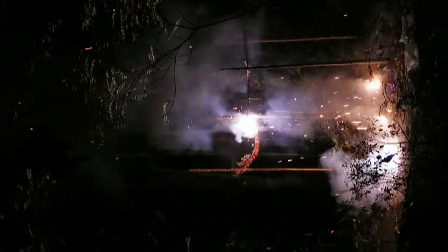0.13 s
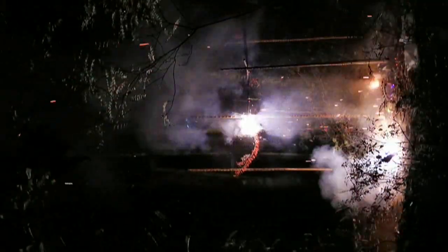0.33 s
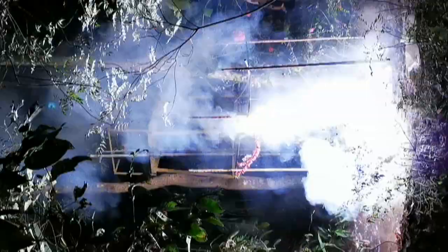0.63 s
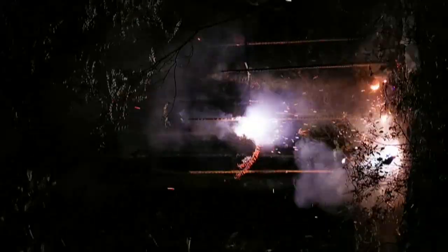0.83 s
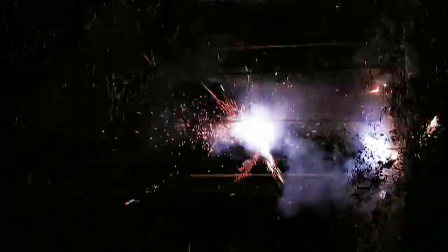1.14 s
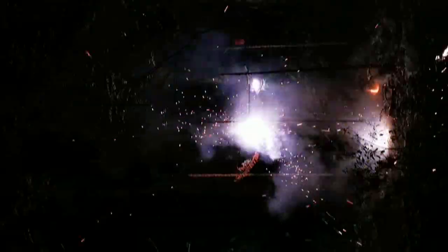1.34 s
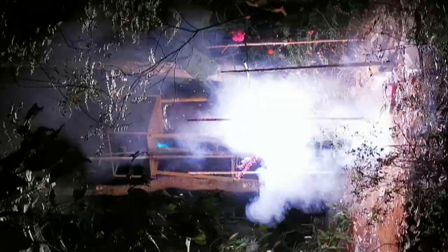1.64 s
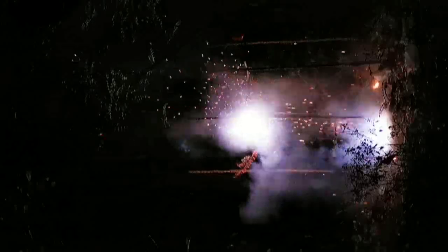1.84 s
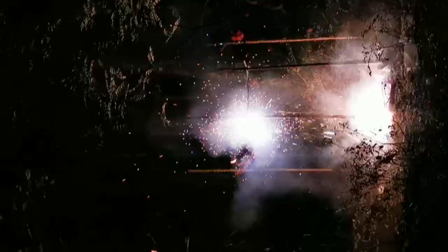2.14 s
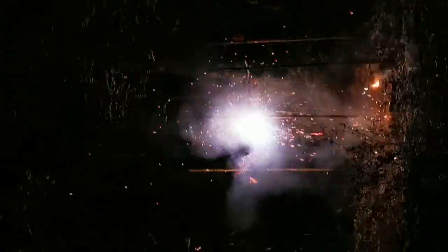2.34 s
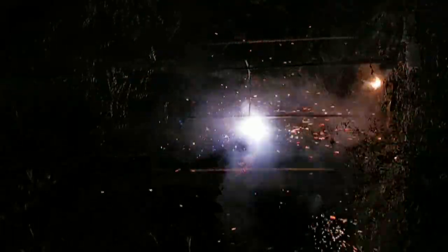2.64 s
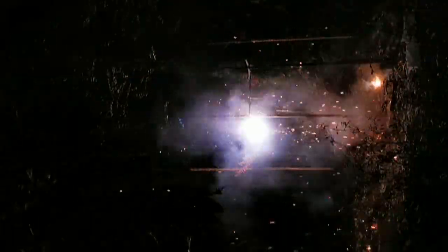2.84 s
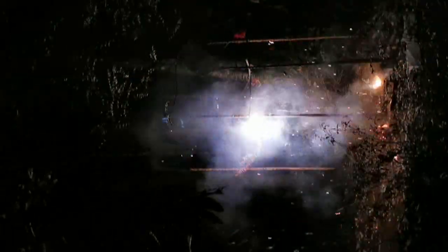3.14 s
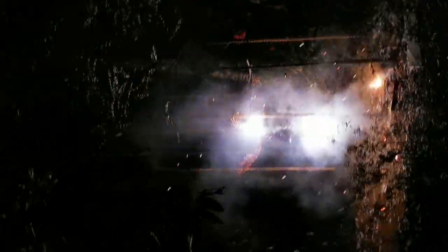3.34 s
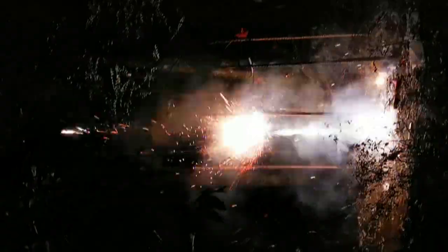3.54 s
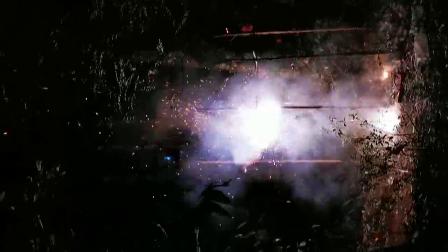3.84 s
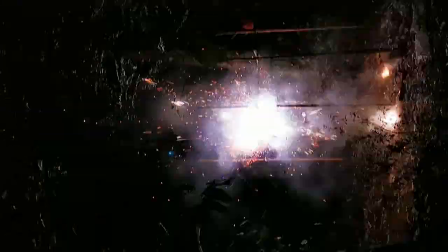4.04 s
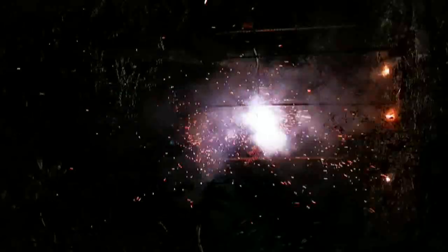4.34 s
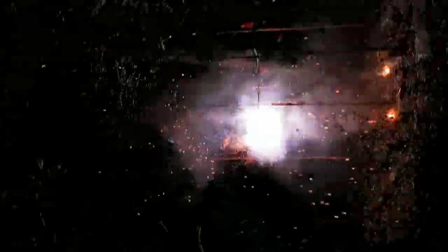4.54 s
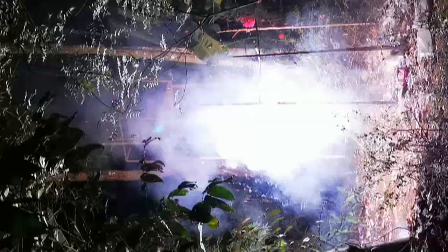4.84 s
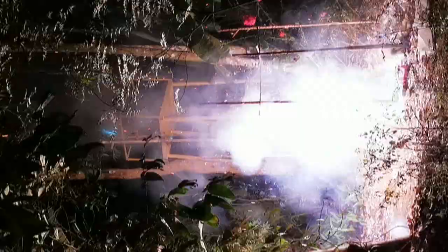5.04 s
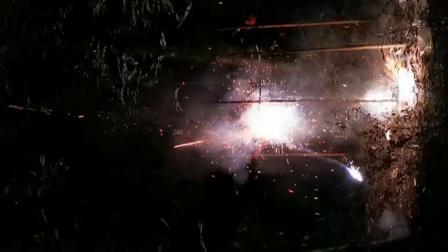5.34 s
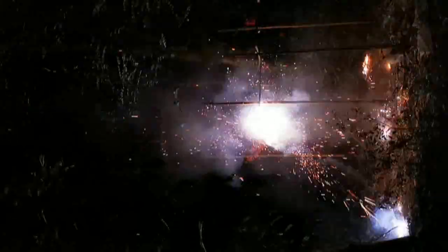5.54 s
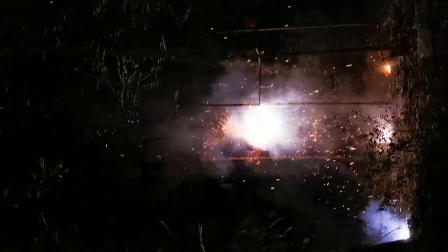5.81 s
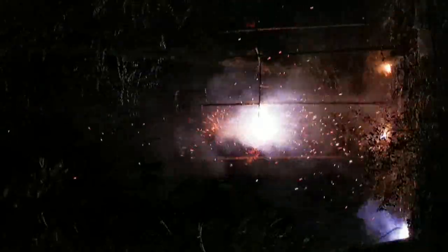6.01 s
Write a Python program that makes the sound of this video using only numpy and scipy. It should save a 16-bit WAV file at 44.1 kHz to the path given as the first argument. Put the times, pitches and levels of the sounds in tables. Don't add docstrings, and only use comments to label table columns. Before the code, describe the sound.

Outdoors among trees at night, firecrackers explode at irregular intervals: sparse at first, then crowded into uneven clusters of sharp cracks, weaker pops and dull double bangs. Low thumps and soft wind rumble sit beneath. Echoes slap back almost at once and roll away for a second or more. Stereo phone sound, mid-heavy, briefly ducking around every bang.

```python
import sys
import numpy as np
from scipy import signal
from scipy.fft import rfft, irfft, next_fast_len
from scipy.io import wavfile
from scipy.ndimage import uniform_filter1d, minimum_filter1d

SR = 44100
rng = np.random.default_rng(int(sys.argv[2]) if len(sys.argv) > 2 else 0)


def digitize_waveform(pressure):
    field = np.atleast_2d(pressure).T
    bounded = np.clip(field, -1, 1)
    quanta = np.round(bounded * 32767).astype(np.int16)
    wavfile.write(sys.argv[1], SR, quanta)


def boost(x):
    u = np.asarray(x, float) / 20
    return 10 ** u


N = 272097
STEP, SIZE = 16, next_fast_len(N)
SLAP_S = 0.0182


def at_hz(points, hz):
    points = np.array(points)
    return np.interp(np.log(hz + 1), np.log(points[:, 0]), points[:, 1])


def full_rate(steps):
    return np.interp(np.arange(N) / STEP, np.arange(len(steps)), steps)


def drift(rate_hz):
    r = np.exp(-2 * np.pi * rate_hz * STEP / SR)
    slow = signal.lfilter([1], [1, -2 * r, r * r], rng.standard_normal(N // STEP + 502))[500:]
    return slow / slow.std()


def dying(power, t60_s, rise_s):
    fall = boost(-120 * STEP / (t60_s * SR))
    rise = np.exp(-STEP / (rise_s * SR))
    tail = signal.lfilter([1], [1, -fall], power)
    return signal.lfilter([1 - rise], [1, -rise], tail)


# (frequency [Hz], correlation [-1..1])
LIKENESS = [(60, 0.62), (140, 0.86), (330, .88), (800, 0.94), (1400, 0.78), (2300, 0.27), (3500, 0.36),
            (7000, 0.053), (15000, 0.13)]
# (frequency [Hz], phase [rad])
LEFT_LEAD = [(0, -2), (1900, 0.03), (2350, -0.94), (3500, 5), (10000, 15), (22050, 30)]


def stereo_noise():
    mid, side = rfft(rng.standard_normal((2, SIZE)), axis=1)
    hz = np.arange(len(mid)) * SR / SIZE
    alike = np.clip(at_hz(LIKENESS, hz), -1, 1)
    common, apart = np.sqrt(1 + alike) * mid, np.sqrt(1 - alike) * side
    left, right = (common + apart) / np.sqrt(2), (common - apart) / np.sqrt(2)
    lead_rad = np.interp(hz, *np.transpose(LEFT_LEAD))
    return hz, np.array([left, right * np.exp(-1j * lead_rad)])


# (time [s], crack peak [dB], scatter [dB], roll above usual [dB], thump [dB])
ON_STRING = [
    (3.758, -9, -9.5, 4.5, -29),
    (4.266, -7.5, -8, 1, -28),
    (4.667, -6, -14.5, 5, -31.5),
    (5.049, -11.5, -12.5, -0.5, -34.5),
    (5.304, -28.5, -29.5, 1, -50),
    (5.651, -18, -40, 2, -63),
    (5.674, -23, -46, 2, -47),
]
STRING_TIP = [
    (2.035, -7.5, -8, 1, -26.5),
    (4.729, -39, -31, 0, -59),
    (4.76, -15, -15.5, 9, -41),
    (5.455, -14, -8.5, 2.5, -40),
    (5.589, -11.5, -9.5, 2.5, -32),
    (5.836, -18, -34, 6, -49),
]
STRING_TOP = [
    (2.689, -13, -16, 1, -52),
    (4.33, -15.5, -16.5, 1.5, -30),
]
FAR_SIDE = [
    (2.007, -19, -21.5, -11, -46.5),
    (2.21, -20.5, -24, 4.5, -43.5),
]
BY_POLE = [
    (0.786, -16.5, -16.5, 2.5, -49),
    (4.227, -26.5, -32.5, 4, -42),
]
THROWN = [
    (0.668, 2.5, -8, 1.5, -27),
    (3.825, -13, -17, -14, -47),
    (5.374, -5, -10, 7.5, -30),
    (5.38, -7, -21, 5, -30.5),
]
THROWN_LOW = [
    (1.127, -5, -11.5, 4.5, -35),
    (4.053, -12, -19.5, 9, -36.5),
    (4.168, -10.5, -18, -5, -34),
    (4.806, -12, -14, 0, -36),
    (5.819, -12, -19.5, 7.5, -46.5),
]
THROWN_HIGH = [
    (2.621, -4.5, -12.5, -2, -33),
    (4.997, -7, -12, 5.5, -32.5),
    (5.757, -15, -16, 1, -58),
]
IN_LITTER = [
    (1.156, -12.5, -11.5, -11, -27),
    (1.174, -9, -16.5, 0, -36),
]
BEHIND_STUMP = [
    (1.778, -8, -16.5, 7.2, -33),
]
NEAR_GROUND = [
    (3.552, -10.5, -23.5, 6, -29.5),
    (3.662, -20.5, -26.5, -1, -37),
]
# (bangs, ground echo delay [ms] and strength [0-1], blast pulse length [ms] and edge [dB],
# echo dullness [dB/octave] and bass [dB])
SPOTS = [(ON_STRING, dict(echo_ms=0.078, echo=0.38, pulse_ms=0.36, edge_db=12, dull_db=1, bass_db=-9)),
         (STRING_TIP, dict(echo_ms=0.093, echo=0.52, pulse_ms=0.47, edge_db=11, dull_db=1.15, bass_db=-9)),
         (STRING_TOP, dict(echo_ms=0.056, echo=0.98, pulse_ms=0.37, edge_db=13, dull_db=-0.65, bass_db=-6)),
         (FAR_SIDE, dict(echo_ms=0.081, echo=0.33, pulse_ms=.5, edge_db=6.5, dull_db=4, bass_db=-8)),
         (BY_POLE, dict(echo_ms=0.12, echo=.9, pulse_ms=0.3, edge_db=5, dull_db=0.1, bass_db=4.5)),
         (THROWN, dict(echo_ms=0.31, echo=0.22, pulse_ms=0.444, edge_db=10.5, dull_db=1.25, bass_db=-7)),
         (THROWN_LOW, dict(echo_ms=0.32, echo=0.18, pulse_ms=.46, edge_db=14, dull_db=0.66, bass_db=2.5)),
         (THROWN_HIGH, dict(echo_ms=0.857, echo=0.41, pulse_ms=.4, edge_db=9, dull_db=0.5, bass_db=-2)),
         (IN_LITTER, dict(echo_ms=.41, echo=0.036, pulse_ms=.98, edge_db=-3, dull_db=2.5, bass_db=-2)),
         (BEHIND_STUMP, dict(echo_ms=0.26, echo=0.41, pulse_ms=.7, edge_db=-6, dull_db=-0.84, bass_db=-0.5)),
         (NEAR_GROUND, dict(echo_ms=0.74, echo=0.49, pulse_ms=.73, edge_db=18, dull_db=-.4, bass_db=13.5))]
SLAP_BELOW_DB, SLAP_PER_CRACK = 4, 0.82


def bangs():
    rows = sorted((row + tuple(spot.values()) for table, spot in SPOTS for row in table))
    names = ["s", "crack_db", "scatter_db", "far_db", "thump_db", *SPOTS[0][1]]
    b = dict(zip(names, np.transpose(rows)))
    b["slap_db"] = SLAP_BELOW_DB + SLAP_PER_CRACK * (b["crack_db"] - b["scatter_db"])
    return b


# (time [s], level [dB])
GUSTS = [
    (0.0, -49),
    (1.15, -50),
    (1.55, -71),
    (2.52, -55),
    (3.1, -62),
    (3.69, -46),
    (4.18, -38),
    (5.45, -48),
    (5.901, -44),
]
GUST_RISE_S, GUST_T60_S = 0.03, 0.8
AIR_DB, STIR_DB, STIR_RISE_S, STIR_T60_S = -62, -16.5, 0.03, 3.3


def rumble():
    hz, noise = stereo_noise()
    lowpass = 1 / np.sqrt(1 + (hz / 150) ** 10)
    highpass = 1 / np.sqrt(1 + (22 / (hz + 1)) ** 4)
    low = irfft(noise * lowpass * highpass, SIZE)[:, :N]
    b = bangs()
    stir, gust = np.zeros((2, N // STEP + 2))
    gust_s, gust_db = np.transpose(GUSTS)
    gust[np.round(np.abs(gust_s) * SR / STEP).astype(int)] = boost(2 * gust_db)
    stir[np.round(b["s"] * SR / STEP).astype(int)] = boost(2 * (b["thump_db"] + STIR_DB))
    power = boost(2 * AIR_DB) + dying(stir, STIR_T60_S, STIR_RISE_S) + dying(gust, GUST_T60_S, GUST_RISE_S)
    return low / low.std() * full_rate(np.sqrt(power) * boost(2.0 * drift(13)))


# (time [s], length [s], level [dB], pitch [Hz])
CHIRPS = [
    (.25, .03, -72, 3290),
    (.305, .04, -64, 3300),
    (.395, .06, -67, 3260),
    (.485, 0.032, -68, 4520),
]
CHIRP_ATTACK_S, CHIRP_RELEASE_S = 0.01, 0.03


def cricket():
    t, out = np.arange(N) / SR, np.zeros(N)
    waver_rad = 2 * np.pi * np.cumsum(6 * full_rate(drift(40))) / SR
    for s, length_s, db, hz in CHIRPS:
        attack = np.clip((t - s) / CHIRP_ATTACK_S, 0, 1)
        release = np.exp(-np.maximum(t - s - length_s, 0) / CHIRP_RELEASE_S)
        out += boost(db) * attack * release * np.sin(2 * np.pi * hz * t + waver_rad)
    return out


# (time [s], peak [dB], pitch [Hz])
SCRAPS = [
    (0.076, -36.5, 7600),
    (.335, -47, 7500),
    (0.486, -51, 3600),
    (3.4748, -36.5, 1290),
    (3.495, -58, 1500),
    (3.52, -51, 6000),
]


def scraps():
    out, t = np.zeros(N), np.arange(SR // 20) / SR
    hisses = rng.standard_normal((len(SCRAPS), len(t)))
    for (s, peak_db, hz), hiss in zip(SCRAPS, hisses):
        tick = signal.lfilter(*signal.butter(1, [hz * 0.93, hz * 1.4], "band", fs=SR), hiss)
        out[round(s * SR):][:len(t)] += boost(peak_db + 4.5) * tick * np.exp(-t / (0.0054 * hz / 1500))
    return out


# (frequency [Hz], scatter t60 [s], roll t60 [s], roll below scatter [dB])
DECAY = [(120, 0.055, 1.17, 13), (256, 0.14, 1.77, 22.5), (578, 0.34, 2.96, 21), (1180, 0.41, 2.02, 15),
         (2440, 0.23, 1.376, 15.5), (4800, 0.078, 0.99, 12.5), (8000, 0.31, 1.03, 7.5),
         (13500, 0.24, 1.2, 19.5)]
BANDS_HZ = [110, 200, 300, 420, 560, 720, 900, 1130, 1400, 1700, 2050, 2450, 2900, 3600, 4800, 7000, 10000,
            14000]
SWELL_S = 0.005
EARLIER_ROLL_DB, EARLIER_DULL_DB_PER_OCT, NIGHT_DB = -47.5, 1, -59
STUMP_EDGE_HZ, STUMP_SHADE_DB = 1500, -9


def echoes():
    b = bangs()
    at = np.round(b["s"] * SR / STEP).astype(int) + 12
    at_slap = at + round((SLAP_S - 0.006) * SR / STEP)
    at_stump = at[np.isin(b["s"], np.transpose(BEHIND_STUMP)[0])]
    hz, noise = stereo_noise()
    noise = noise / np.sqrt(1 + (60 / (hz + 1)) ** 4)
    lumps, out = drift(130), 0
    for k, centre_hz in enumerate(BANDS_HZ):
        scatter_t60_s, roll_t60_s, roll_db = [at_hz(np.array(DECAY)[:, [0, c]], centre_hz) for c in (1, 2, 3)]
        share = at_hz(list(zip(BANDS_HZ, np.arange(len(BANDS_HZ)) == k)), hz)
        band = irfft(noise * share, SIZE)[:, :N]
        octaves = np.log2(centre_hz / 1500)

        echo = np.clip(b["echo"], 0, 1) / (1 + (centre_hz / 4500) ** 4)
        comb = 1 + echo ** 2 + 2 * echo * np.cos(2 * np.pi * centre_hz * b["echo_ms"] / 1000)
        bass_db = b["bass_db"] / (1 + (centre_hz / 600) ** 4)
        hits, late = np.zeros((2, N // STEP + 2))
        hits[at] = comb * boost(2 * (b["scatter_db"] + 6.0 - b["dull_db"] * octaves + bass_db))
        hits[at_stump] *= boost(2 * STUMP_SHADE_DB * (centre_hz > STUMP_EDGE_HZ))
        if k == 0:
            hits[at] = boost(2 * (b["thump_db"] + 22.0))
        late[at_slap] = hits[at] * boost(2 * (-1.0 - b["slap_db"]))
        near = dying(hits, scatter_t60_s, SWELL_S) + dying(late, 0.3, 0.0038)
        near = near * boost(2 * (2.0 * lumps + 1.1 * drift(68)))

        hits[at] *= boost(2 * b["far_db"])
        hits[0] = boost(2 * (EARLIER_ROLL_DB + 12.5 + roll_db - EARLIER_DULL_DB_PER_OCT * octaves))
        far = dying(hits, roll_t60_s, 0.0022) * boost(-2 * roll_db) + boost(2 * NIGHT_DB)
        out = out + band * full_rate(np.sqrt(near + far * boost(2 * 0.29 * drift(21))))
    return out


CRACK_S, CRACK_TOP_HZ = 0.0026, 8970


def crack(peak_db, length_ms, edge_db, draw):
    length = max(length_ms * SR / 1000, 3)
    pulse = 1 - 2.3 * np.arange(round(length)) / length
    pulse[:2] += boost(edge_db) * np.array([1, -1])
    train = np.zeros((2, round(CRACK_S * SR) + 24))
    train[:, 4] = 1.4
    for lag, size, skew in draw:
        i = 12 + int(lag * CRACK_S * SR)
        strength = np.sign(size - 0.5) * (0.3 + abs(size - 0.5)) * (1 - 0.46 * lag)
        train[0, i] += strength
        train[1, i + int(9 * skew)] += strength
    level = boost(peak_db) / np.sqrt(length * np.sum(train ** 2) / 60)
    return level * signal.fftconvolve(train, pulse[None])


def cracks():
    out, push = np.zeros((2, N + SR)), np.zeros((2, N + SR))
    t = np.arange(-400, 1600) / SR
    b = bangs()
    draws = rng.random((len(b["s"]), 2, 12, 3))
    names = ("s", "crack_db", "slap_db", "thump_db", "echo_ms", "echo", "pulse_ms", "edge_db")
    columns = [b[name] for name in names]
    for s, peak_db, slap_db, thump_db, echo_ms, ground, ms, edge_db, draw in zip(*columns, draws):
        direct = crack(peak_db + 15.0, ms, edge_db, draw[0])
        slap = crack(peak_db + 10.5 - slap_db, 1.32 * ms, edge_db - 11.0, draw[1])
        for wave, start_s in ((direct, s), (slap, s + SLAP_S)):
            i = round(start_s * SR) + 72
            j = i + round(echo_ms * SR / 1000)
            out[:, i:i + wave.shape[1]] += wave
            out[:, j:j + wave.shape[1]] += np.clip(ground, 0, 1) * wave
        phase_rad = 2 * np.pi * (85 * t + draw[0, 0, 0] + 0.36 * draw[0, :2, 1:2])
        swell = np.exp(-((t - 0.004) / 0.0028) ** 2)
        push[:, round(s * SR) - 400:][:, :len(t)] += boost(thump_db + 19.0) * np.sin(phase_rad) * swell
    band = signal.butter(2, [260, CRACK_TOP_HZ], "band", fs=SR, output="sos")
    return (signal.sosfilt(band, out) + push)[:, :N]


def scene():
    return cracks() + echoes() + rumble() + scraps() + cricket()


def port(x, points):
    cepstrum = irfft(np.log(boost(at_hz(points, np.arange(2049) * SR / 4096))))
    cepstrum[1:2048] *= 2
    cepstrum[2049:] = 0
    return signal.fftconvolve(x, irfft(np.exp(rfft(cepstrum))))[:N]


# (start [s], end [s], edge [Hz], depth [dB])
WIND_FILTER = [(0.689, 0.806, 190, 8), (0.785, 1.113, 264, 25), (1.167, 1.29, 227, 5),
               (1.283, 1.514, 210, 19), (2.41, 2.61, 258, 3), (2.67, 2.898, 313, 7.5),
               (3.836, 4.038, 244, 24), (4.34, 4.51, 340, 11), (2.7, 2.787, 750, 5),
               (4.452, 4.665, 810, 3.5), (4.037, 4.16, 60, 11), (5.083, 5.288, 233, 6),
               (5.622, 5.74, 200, 9)]


def wind_filter(x):
    x = x.copy()
    for start_s, end_s, edge_hz, depth_db in WIND_FILTER:
        a, b = round((start_s - 0.1) * SR), round((end_s + 0.1) * SR)
        t = np.arange(a, b) / SR
        bass = signal.sosfiltfilt(signal.butter(8, edge_hz, fs=SR, output="sos"), x[:, a:b])
        closed = np.clip(np.minimum(t - start_s, end_s - t) / 0.0055, 0, 1)
        x[:, a:b] -= bass * (1 - boost(-abs(depth_db))) * closed
    return x


LIMIT_DB, RECOVER_DB_PER_S, SQUEEZE, AHEAD_S = -12.5, 608, 0.33, 0.008


def limiter(x):
    over_db = np.maximum(20 * np.log10(np.abs(x).max(axis=0) + 1e-9) - LIMIT_DB, 0)
    ramp_db, ahead = RECOVER_DB_PER_S * np.arange(N) / SR, round(AHEAD_S * SR)
    held_db = np.maximum.accumulate(over_db + ramp_db) - ramp_db
    early_db = -minimum_filter1d(-held_db, ahead, origin=-(ahead // 2))
    return x * boost(-np.clip(SQUEEZE, 0, 0.9) * uniform_filter1d(early_db, round(0.002 * SR)))


STARVED_HZ, KEPT_SHARE, ATTACK_JUMP_DB, QUIET_DB = 9700, 0.55, 12, -50


def starved_treble(x):
    hz, _, z = signal.stft(x, SR, nperseg=1024)
    strips = rng.random((len(hz) // 3 + 1, z.shape[2] // 2 + 1)) < KEPT_SHARE
    kept = np.kron(strips, np.ones((3, 2)))[:len(hz), :z.shape[2]] / np.sqrt(KEPT_SHARE)
    level = np.sqrt(np.sum(np.abs(z[:, hz > STARVED_HZ]) ** 2, axis=(0, 1)))
    jump = level > boost(ATTACK_JUMP_DB) * np.roll(level, 1)
    quiet = level < boost(QUIET_DB) * level.max()
    spared = (hz[:, None] < STARVED_HZ) | quiet | jump | np.roll(jump, 1)
    return signal.istft(z * np.where(spared, 1, kept), SR, nperseg=1024)[1][:, :N]


def top_cut(x):
    return signal.sosfilt(signal.butter(12, 16510, fs=SR, output="sos"), x)


# (frequency [Hz], gain [dB])
LEFT_PORT = [(40, -9), (330, -4), (700, -9.5), (1150, -8), (2050, -8), (2450, 0.5), (3100, -7), (5600, -7),
             (6250, -13.5), (7500, -4), (8300, -16), (9800, -30), (15500, -37), (20000, -91)]
RIGHT_PORT = [(40, -10.5), (150, -5.5), (330, -4.5), (700, -10), (1250, -7.5), (2300, 0), (2700, -5),
              (3300, -13), (4200, -13), (5200, -8.5), (6500, -24.5), (9000, -34.5), (12000, -55),
              (15300, -47)]
OVERLOAD, TOP_HZ = 0.76, 15200


def record(dry):
    x = np.array([port(dry[0], LEFT_PORT), port(dry[1], RIGHT_PORT)])
    x = wind_filter(OVERLOAD * np.tanh(x / OVERLOAD))
    x = limiter(x)
    x = signal.sosfilt(signal.ellip(8, 1, 28, TOP_HZ, fs=SR, output="sos"), x)
    mix = starved_treble(x)
    return top_cut(mix)


dry = scene()
out = record(dry)
digitize_waveform(out)
```